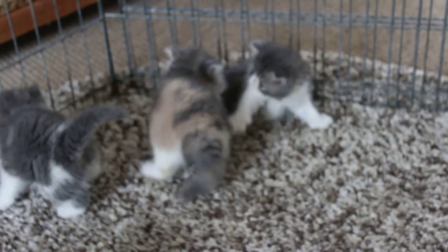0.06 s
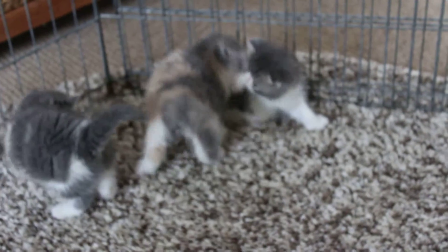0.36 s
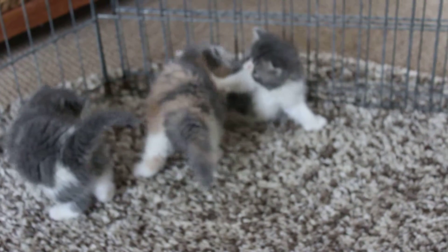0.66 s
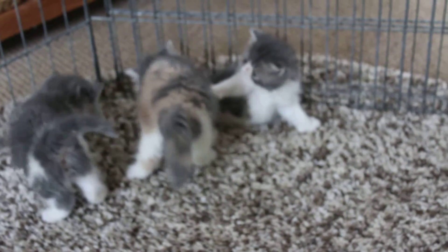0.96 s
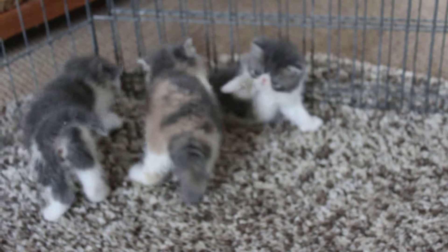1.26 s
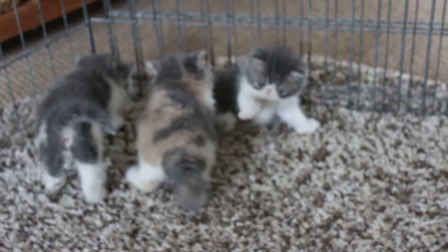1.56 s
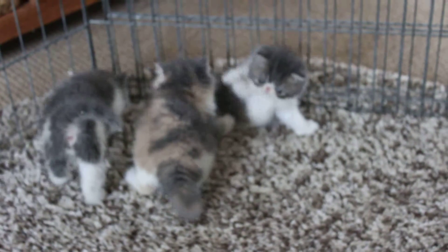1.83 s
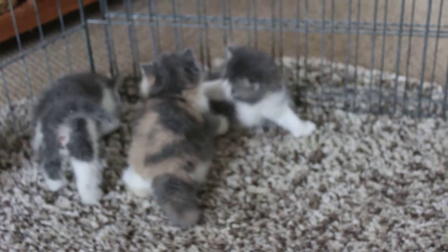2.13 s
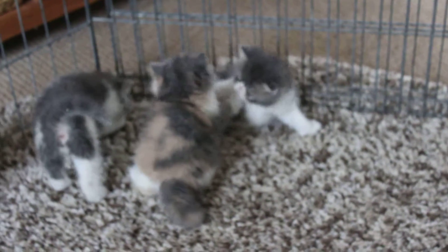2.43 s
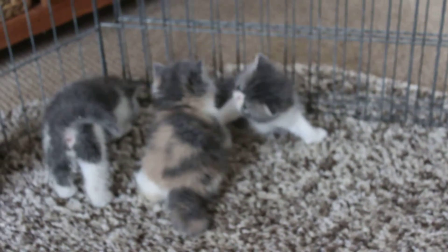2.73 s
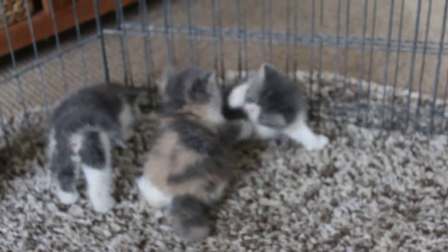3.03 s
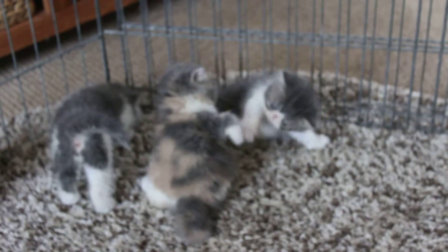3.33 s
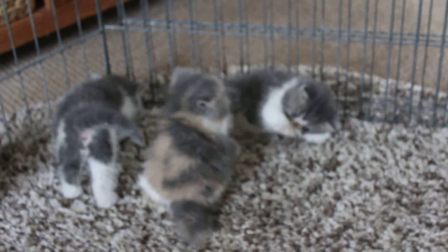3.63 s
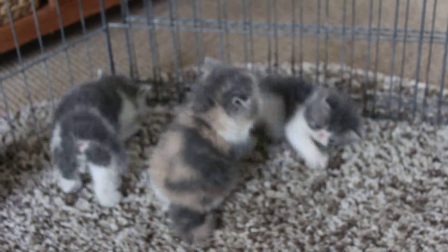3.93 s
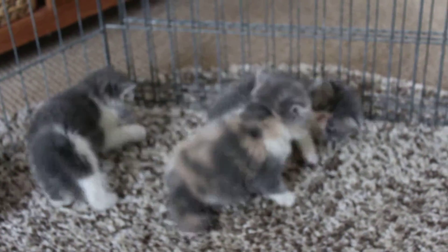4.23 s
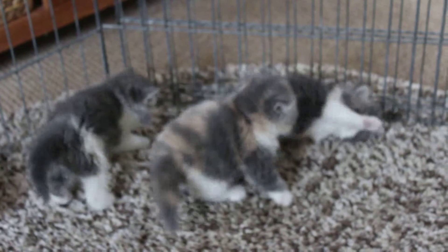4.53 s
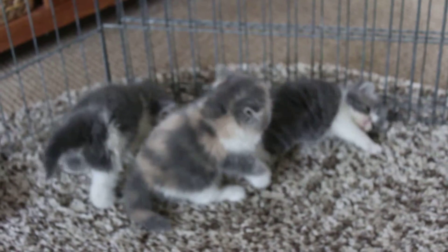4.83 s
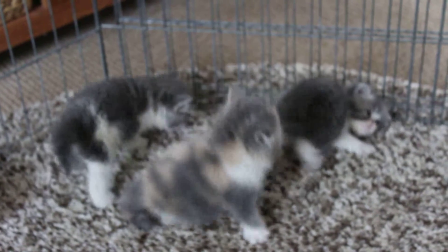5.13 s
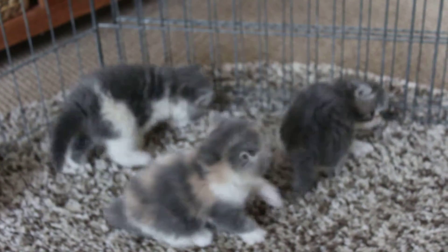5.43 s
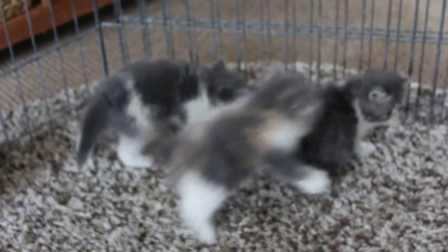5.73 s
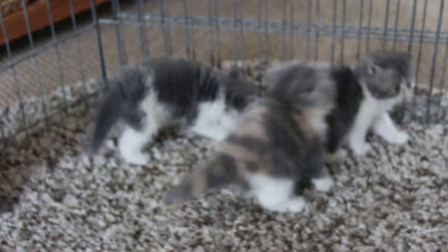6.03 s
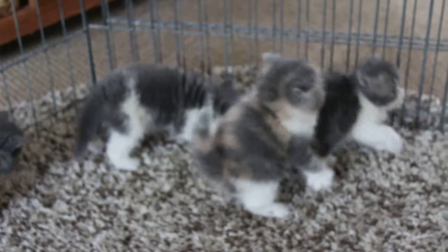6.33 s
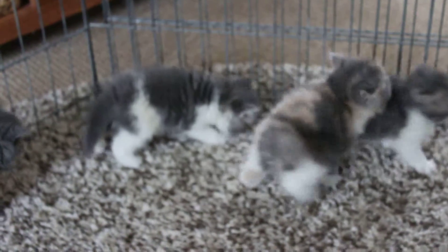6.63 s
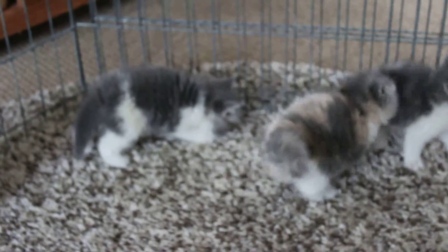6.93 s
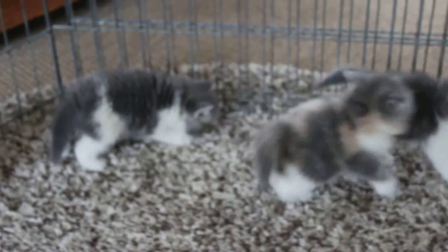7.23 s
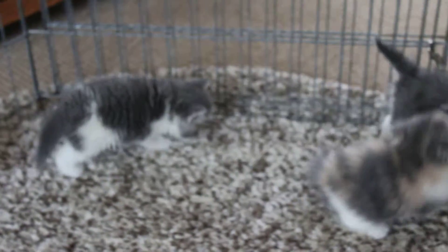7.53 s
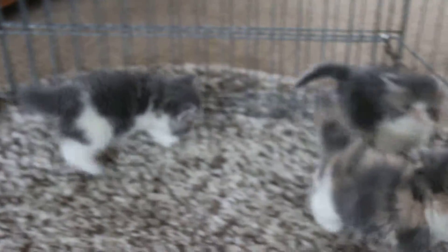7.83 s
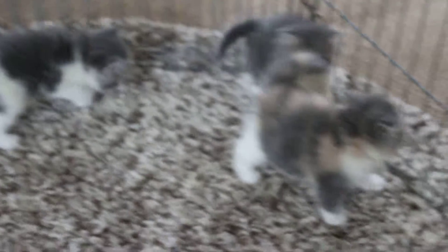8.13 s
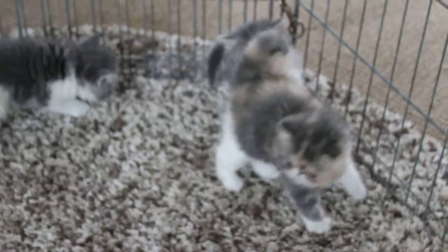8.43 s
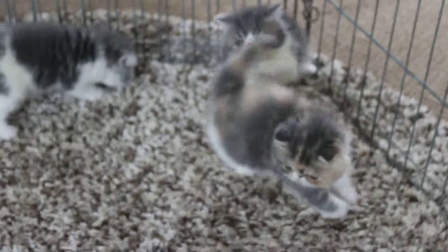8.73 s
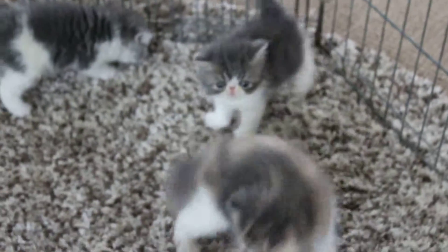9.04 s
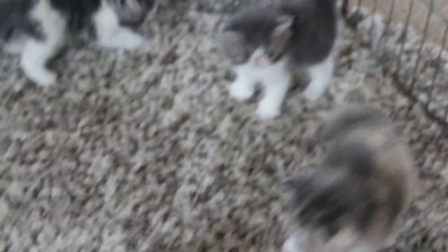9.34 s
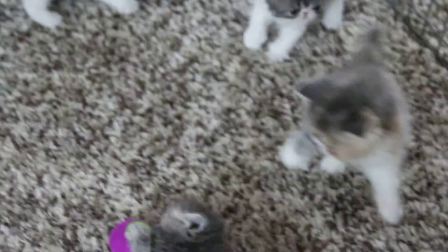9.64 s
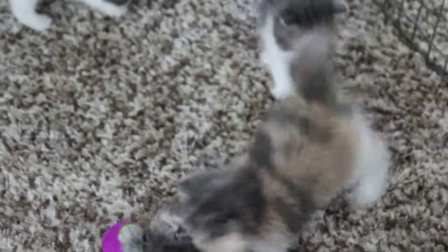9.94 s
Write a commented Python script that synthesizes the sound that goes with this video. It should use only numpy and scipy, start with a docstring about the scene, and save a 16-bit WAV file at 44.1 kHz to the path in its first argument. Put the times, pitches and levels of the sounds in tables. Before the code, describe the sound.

Kittens wrestle on a shag carpet in a quiet room, heard fairly close in mono. Fur and paws brush softly over the pile, and a light bump makes their wire pen ring. Claws rasp and pluck the carpet in runs of sharp snaps, with a few soft thuds. After a brief lull the scratching resumes, the pen rattles again, and the loudest snaps come near the end.

```python
"""Kittens wrestle on a shag carpet inside a wire pen, in a quiet room, heard in mono.
From the start, fur and paws brush the carpet. At 0.5 s a body jostles the pen and its wires ring.
Then claws catch loops of the pile and let them go in runs of sharp snaps. Soft thuds sound through
the floor near 4 and 5 s, and the claws rest around 6 s. They start again, the pen rings once more
at 7.6 s among further thuds, and the loudest snaps come near 9 s."""
import sys
import numpy as np
from scipy import signal
from scipy.fft import rfft, irfft
from scipy.io import wavfile
from scipy.ndimage import uniform_filter1d

SR = 44100
rng = np.random.default_rng(int(sys.argv[2]) if len(sys.argv) > 2 else 0)


def inscribe(sig):
    """Save sig as 16-bit PCM at rate SR to the path in sys.argv[1].

    A 1-D sig is mono; a 2-D sig holds one channel per row.
    Samples are clipped to [-1, 1] before scaling.
    """
    pcm = np.round(np.clip(np.atleast_2d(sig).T, -1, 1) * 32767)
    wavfile.write(sys.argv[1], SR, pcm.astype(np.int16))


N = 439677


def gain_of(db):
    """Turns decibels into a factor to multiply by."""
    return 10 ** (np.asarray(db) / 20)


def evened(x):
    """Scales a signal to an average strength (rms) of 1."""
    return x / np.sqrt(np.mean(x ** 2) + 1e-20)


def read(points, hz):
    """Looks up a table's value at the frequency hz."""
    f, value = np.transpose(points)
    return np.interp(np.log(hz + 1), np.log(f + 1), value)


def add(mix, s, sound):
    """Lays a sound into the mix at time s."""
    part = mix[max(round(s * SR), 0):][:len(sound)]
    part += sound[:len(part)]


def noise(tone):
    """Steady noise of strength 1, shaped by a tone table."""
    gains = gain_of(read(tone, np.fft.rfftfreq(N, 1 / SR)))
    return evened(irfft(rfft(rng.standard_normal(N)) * gains, N))


# tone of the quiet room: f/Hz, level/dB (levels in all tables are relative)
AIR_TONE = [(12, -38), (20, -12), (37, -10.5), (77, -0.5), (142, -3.5), (228, -4), (527, -6), (642, -7),
            (1000, -9.5), (1570, -11.5), (2260, -12), (4540, -19), (5850, -21.5), (14300, -36.5),
            (16000, -61)]
def air(noise_db=-51.5, hum_db=-65, hum_hz=118.7):
    """Steady room noise with a faint, wavering mains hum."""
    t = np.arange(N) / SR
    waver = evened(uniform_filter1d(rng.standard_normal(N), size=12000))
    hum = np.sin(2 * np.pi * hum_hz * t + 0.75 * waver)
    return gain_of(noise_db) * noise(AIR_TONE) + gain_of(hum_db) * hum


# fur sliding over the carpet: t/s, rub level/dB, fizz level/dB
FUR_LEVELS = [(0, -62, -70), (0.7, -54, -55), (1.5, -57, -61), (2.05, -57, -65), (2.42, -48, -56),
              (2.78, -53.5, -55), (3.1, -52, -64), (3.6, -52, -55), (4.1, -51.5, -55), (4.4, -50.5, -59),
              (5.2, -50.5, -58), (6.6, -52, -65), (7.0, -49, -64), (7.7, -48, -53), (8.7, -49.5, -57),
              (9.2, -49.5, -50), (9.6, -49.5, -70), (9.97, -52.5, -71)]
# tones of the soft rub and the high fizz: f/Hz, level/dB
RUB_TONE = [(300, -2.5), (900, -3), (1350, 4), (1800, -4), (2400, -1), (3500, 1), (4400, -1), (4900, 0),
            (5600, -5), (8000, -14.5), (12000, -43)]
FIZZ_TONE = [(4000, -19), (6000, -10), (7900, 9), (8800, 5), (10100, -1), (12000, -18), (16000, -38)]
def brushing():
    """Fur and paws slide over the carpet, which hisses softly and crackles."""
    times, *levels = np.transpose(FUR_LEVELS)
    rub_db, fizz_db = [np.interp(np.arange(N) / SR, times, db) for db in levels]
    hiss = gain_of(rub_db - 5.5) * noise(RUB_TONE) + gain_of(fizz_db - 12) * noise(FIZZ_TONE)
    return hiss + gain_of(rub_db - 11.5) * crackle()


def crackle(slips_per_s=110, spread_db=4, fibres=12):
    """Single fibres slip at random under a sliding paw."""
    out = np.zeros(N)
    for pitch_hz in rng.uniform(4800, 4850, fibres):
        slips = rng.random(N) < slips_per_s / fibres / SR
        strength = gain_of(spread_db * np.minimum(rng.exponential(1, N), 2.5))
        out += signal.oaconvolve(slips * strength, snap(pitch_hz, body_db=4.5, tick_db=-18))[:N]
    return evened(out)


# tones of a snap's dull body and bright tick: f/Hz, level/dB
BODY_TONE = [(60, -20), (300, -8), (650, -5), (1300, 0.5), (2400, 0.5), (4200, -0.5), (7000, -4.5),
             (10000, -12), (16000, -47)]
TICK_TONE = [(3000, -40), (7000, -6), (8600, 0.5), (9900, 6), (11300, -1.5), (12800, -20), (16000, -36)]
def snap(pitch_hz, body_db, tick_db, width_hz=1200, uneven_db=2.5, size=512):
    """One fibre springs free: a very short ring with a dull body and a bright tick."""
    hz = np.fft.rfftfreq(size, 1 / SR)
    ring = np.exp(-.5 * ((hz - pitch_hz) / width_hz) ** 2)
    body = gain_of(body_db + read(BODY_TONE, hz))
    tick_shift = (pitch_hz / 5540) ** 0.13 * np.exp(0.043 * rng.standard_normal())
    tick = gain_of(tick_db + read(TICK_TONE, hz / tick_shift))  # a taut fibre ticks higher
    power = ring ** 2 + body ** 2 + tick ** 2
    ripple = uniform_filter1d(rng.standard_normal(len(hz)), size=9)  # no two fibres alike
    ripple = evened(uniform_filter1d(ripple, size=7))
    log_gain = np.log(np.sqrt(power) * gain_of(uneven_db * ripple) + 1e-5)
    mirrored = np.concatenate([log_gain, log_gain[-2:0:-1]])
    spectrum = np.exp(np.conj(signal.hilbert(mirrored)))[:len(hz)]  # packs the sound into a sharp start
    recoil_s = 0.000408 * rng.uniform(0.53, 1.617)
    spectrum *= 1 + 0.15 * np.exp(-2j * np.pi * hz * recoil_s)  # the fibre whips back once
    spectrum *= np.exp(-1j * np.pi * .00012 * hz ** 2 / pitch_hz)  # high notes trail the low ones
    return irfft(spectrum * np.sqrt(power.sum() / np.sum(abs(spectrum) ** 2)), size)


# shifts of weight: loudest t/s, level/dB, half length/s
WEIGHT_SHIFTS = [(0.12, -53, 0.21), (0.55, -46, 0.066), (2.55, -50, 0.37), (3.36, -46, 0.16),
                 (4.551, -53, 0.19), (5.85, -51.5, 0.32), (6.804, -46.5, 0.19), (7.618, -47, 0.14),
                 (8.548, -50.5, 0.11), (9.25, -51, 0.32)]
# their dull tone: f/Hz, level/dB
SHIFT_TONE = [(80, -13), (190, -3.5), (275, 3), (370, -8), (500, -2.5), (900, -16.5), (2000, -44)]
def shuffle(stir_db=-67):
    """A slight, dull stir swells each time a body shifts its weight."""
    t = np.arange(N) / SR
    swells = sum(gain_of(db - 6.5) ** 2 * np.exp(-((t - s) / half) ** 2)
                 for s, db, half in WEIGHT_SHIFTS)
    return np.sqrt(gain_of(stir_db) ** 2 + swells) * noise(SHIFT_TONE)


# pushes on the pen: t/s, level/dB, rise/s, fall/s, hardest-hit f/Hz, boost there/dB,
# width of the boost in log pitch, ring compared with rattle/dB
PEN_PUSHES = [(0.502, -41, 0.018, 0.042, 2800, -3, 0.6, -1.5),
              (7.59, -42.5, 0.05, 0.022, 6860, 8, 0.2, -11),
              (7.619, -35, 0.0037, 0.038, 7000, 4, 0.22, -3.5)]
# notes of the wires: f/Hz, level/dB, time to fade by 60 dB/s
WIRE_NOTES = [(596, 3, 0.32), (800, -4, 0.2), (976, -6, 0.35), (2080, 2, 0.32), (3390, -1.5, 0.13),
              (4680, 1, 0.35), (4980, -3, 0.2), (5850, -9, 0.22), (6600, -7, 0.3), (6681, -6, 0.27),
              (7359, -4, 0.19), (7682, 0, 0.38), (7960, -1, 0.3), (9500, -2, 0.22), (9970, -2, 0.25),
              (10900, -4, 0.33), (11400, -7, 0.22)]
# tone of the rattling joints and frame: f/Hz, level/dB
RATTLE_TONE = [(40, -5), (90, 11), (170, 11.5), (320, 7.5), (520, 5.5), (780, 5), (1400, -2), (2200, 0.5),
               (3100, 4), (5000, 1), (6100, 2), (7800, 0), (8700, -0.5), (9900, 1.5), (11300, -8),
               (12300, -12), (16000, -27)]
def pen(length_s=.8, lead_s=.2, pushed_db=11):
    """Loose joints rattle and set the wires ringing, most of all the ones that are pushed."""
    out, t = np.zeros(N), np.arange(int(length_s * SR)) / SR
    hz = np.fft.rfftfreq(len(t), 1 / SR)
    for s, db, rise, fall, struck_hz, boost_db, width, ring_db in PEN_PUSHES:
        nearness = lambda f: np.exp(-(np.log((f + 1) / struck_hz) / width) ** 2)
        push = np.exp(-np.maximum((lead_s - t) / rise, (t - lead_s) / fall))
        rattle = push * noise(RATTLE_TONE)[:len(t)]
        ring = np.zeros(len(t))
        for wire_hz, wire_db, fade_s in WIRE_NOTES:
            energy = signal.lfilter([1], [1, -gain_of(-120 / fade_s / SR)], push ** 4)
            drift = 0.0055 * np.cumsum(push * rng.standard_normal(len(t)))  # knocks nudge the wave
            strength = gain_of(wire_db + pushed_db * nearness(wire_hz)) * np.sqrt(energy)
            ring += strength * np.sin(2 * np.pi * (wire_hz * t + drift + rng.random()))
        sound = rattle + gain_of(ring_db) * np.std(rattle) * evened(ring)
        tone = gain_of(db + boost_db * (nearness(hz) - .5))
        add(out, s - lead_s, irfft(rfft(sound) * tone, len(t)))
    return out


# claw strokes: t/s, length/s, slips, level/dB, f/Hz, fullness of tone/dB, first gap over last gap
CLAW_DRAGS = [(0.666, 0.047, 5, -19, 5500, -2, 0.97), (0.755, 0.025, 3, -2.5, 5900, -11, 0.7),
              (0.886, 0.042, 5, -17, 6200, -5.5, 0.87), (0.968, 0.036, 3, -2, 6000, -10, 1.02),
              (1.192, 0.05, 5, -15.5, 5370, -8, 1.1), (1.279, 0.065, 6, -23, 5000, 1, 1.1),
              (1.697, 0.1, 8, -21, 4800, -0.5, 1.2), (1.912, 0.08, 7, -27, 8400, 3.5, 0.9),
              (2.154, 0.23, 14, -24, 4700, 0, 0.89), (2.4643, 0.06, 5, -20.5, 5400, 4, 2),
              (3.008, 0.09, 8, -14.5, 4700, -3, 2.15), (3.1198, 0.078, 5, -17.5, 5195, 3.5, 1.9),
              (3.308, 0.08, 9, -14.5, 5200, -12, 1.15), (3.444, 0.056, 7, -18, 5180, -5.5, 1),
              (3.5114, 0.096, 9, -11, 5300, -7.5, 0.91), (3.704, 0.04, 4, -16.5, 4900, -2, 1.05),
              (3.7896, 0.12, 10, 1, 5550, -11, 3.76), (4.237, 0.12, 9, -20, 4470, -5, 0.91),
              (4.46, 0.036, 3, -15.5, 6500, 0, 1.1), (4.556, 0.037, 4, -15.5, 5460, -9, 1.17),
              (4.7327, 0.089, 4, -8, 4400, -2.5, 0.92), (4.831, 0.088, 8, -21, 4710, -4, 0.86),
              (4.955, 0.13, 14, -12.5, 5550, -13, 1.04), (5.167, 0.18, 16, -22.5, 6100, -7, 1.1),
              (5.421, 0.22, 20, -24, 8100, -8, 0.86), (6.773, 0.06, 7, -24, 8600, -6, 1.06),
              (6.968, 0.052, 3, -11, 6640, -2.5, 1.4), (7.2, 0.085, 9, -14.5, 5600, -9, 0.86),
              (7.43, 0.1, 8, -18.5, 5180, -12, 0.95), (7.788, 0.077, 4, -9, 6100, -5, 0.87),
              (7.931, 0.027, 4, -11, 4195, -7.5, 0.9), (8.227, 0.11, 12, -23.5, 5400, 2.5, 1.05),
              (8.3883, 0.038, 5, -5.5, 5850, -11, 0.88), (8.525, 0.11, 9, -21.5, 5330, -6.5, 0.88),
              (8.7, 0.099, 8, -21, 4800, -14, 1.2), (8.884, 0.11, 9, -16.5, 5190, -3, 1),
              (9.1556, 0.052, 4, -4.5, 5530, -11, 0.7), (9.4826, 0.13, 13, -13.5, 5070, -12.5, 0.93),
              (9.69, 0.061, 6, -15, 4970, -11, 1.16), (9.81, 0.088, 9, -18.5, 4950, -15, 1.05)]
# a slight, narrow dip in their tone: f/Hz, width/Hz, level/dB
RASP_DIP = [(4610, 260, -0.5)]
def claw_drags(soft_ends_db=7.5, scatter_db=1.6):
    """A dragged claw rasps over loop after loop, hardest in mid-stroke, with thin fibres between."""
    slips = []
    for start, length, count, db, pitch_hz, fullness_db, quickening in CLAW_DRAGS:
        gap, force, tune = rng.standard_normal((count, 3)).T
        unevenness = .06 - .006 * db  # a light drag is less even
        gaps = np.geomspace(quickening, 1, count - 1) * np.exp(unevenness * gap[1:])
        times = start + length * np.append(0, np.cumsum(gaps)) / gaps.sum()
        stroke = (2 * np.arange(count) + 1) / count - 1  # runs from about -1 to 1
        levels = db - soft_ends_db * stroke ** 2 + scatter_db * force
        slips += zip(times, levels, pitch_hz * (1 + 0.055 * tune), fullness_db - 3 * stroke)
        thin_times, thin_db = np.cumsum(rng.uniform(.005, .02, size=40)), 0.57 * db - 21
        for s, luck in zip(thin_times, rng.standard_normal(40)):
            if s < length:
                slips.append((start + s, thin_db + scatter_db * luck, pitch_hz, fullness_db))
    near, sideways = release_fibres(slips)
    rasp = gain_of(-0.35) * near + gain_of(-6.5) * room(sideways)
    hz = np.fft.rfftfreq(N, 1 / SR)
    dip = sum((gain_of(db) - 1) / (1 + 2j * (hz - f) / width) for f, width, db in RASP_DIP)
    return irfft(rfft(rasp) * (1 + dip), N)


# echoes from nearby surfaces: delay/s, level/dB
NEAR_ECHOES = [(0.0034, -13.5), (0.0039, -17), (0.0098, -12), (0.0114, -19.5), (0.0145, -26), (0.0214, -24)]
def release_fibres(rows, scatter_db=5):
    """Returns snaps with their first echoes, and the broader sound they send sideways into the room."""
    near, sideways = np.zeros((2, N))
    for s, db, pitch_hz, fullness_db in rows:
        # the more suddenly a fibre lets go, the more body and tick it has
        body_db, tick_db = fullness_db + 0.7, 1.28 * fullness_db - 7.5
        add(near, s, gain_of(db) * snap(pitch_hz, body_db, tick_db))
        side_hz = pitch_hz * rng.uniform(0.9, 1.03)
        side = gain_of(db - 3) * snap(side_hz, body_db, tick_db, width_hz=1450, uneven_db=3)
        add(sideways, s, side)
        paths = rng.standard_normal((len(NEAR_ECHOES), 2))  # each spot has its own echo paths
        for (delay, echo_db), (shift, luck) in zip(NEAR_ECHOES, paths):
            add(near, s + delay * (1 + .04 * shift), gain_of(echo_db + scatter_db * luck) * side)
    return near, sideways


# tough carpet loops snapping free: t/s, level/dB, f/Hz, fullness of tone/dB
LOOP_SNAPS = [(0.7437, -3, 5950, -14), (0.8335, -1.5, 5700, -10), (0.8662, -6, 5800, -10),
              (0.9406, -1.5, 6840, -11), (1.144, -19, 8200, -1), (1.178, -12, 5960, -1),
              (1.2696, -10.5, 5280, -3.5), (2.3146, -15, 5100, -6), (2.3995, -15, 5600, 5),
              (2.4391, -18.5, 5950, 4.5), (2.7964, -16, 7850, -5), (2.8924, -3.5, 6040, -7.5),
              (2.9299, -6.5, 5940, -10), (2.9527, -1, 7140, -8), (2.9714, 5, 5540, -14),
              (2.979, -4.5, 4700, -1.5), (3.5772, -8.5, 5500, -15), (3.7583, -13.5, 5760, 3.5),
              (4.1761, -10.5, 5600, -3), (4.3718, -4, 5500, -9), (4.385, -8.5, 5400, -3.5),
              (4.3938, -11, 6900, 0), (4.4315, -8.5, 6160, -1), (5.022, -6, 5860, -22),
              (6.886, 2.5, 6400, -12.5), (6.9274, -0.5, 5300, -3.5), (6.9509, -5.5, 5270, -1),
              (7.076, 6, 6500, -13.5), (7.1165, -0.5, 7500, -8), (7.126, -0.5, 6460, -15),
              (7.1686, -3.5, 7080, -12), (7.676, -6, 5300, -15), (7.698, 2, 6140, -15),
              (7.7619, -0.5, 6090, -6), (8.3594, -6.5, 5900, -10.5), (8.803, 0, 4420, -10),
              (8.8268, 11, 6360, -18), (8.8511, 3.5, 5920, -12.5), (9.0452, 9, 6750, -14),
              (9.0802, 1, 5730, -9), (9.109, -4, 6100, -4), (9.1314, -7.5, 5780, 1.5),
              (9.261, 11, 5580, -7), (9.3206, 0.5, 6470, -8), (9.3736, 5.5, 6300, -11.5),
              (9.4328, -5.5, 4700, -9), (9.4591, -9.5, 4820, -6), (9.8675, -6.5, 5760, -16)]
def claw_snaps():
    """A claw catches one tough loop at a time and lets it go with a sharp snap."""
    near, sideways = release_fibres(LOOP_SNAPS)
    return gain_of(0.34) * near + gain_of(-7.5) * room(sideways)


# blows on the floor: t/s, level/dB, f/Hz halfway down the pitch drop, time to fade by 60 dB/s
FLOOR_THUDS = [(3.985, -45, 118, 0.15), (5.126, -44, 83, 0.16), (7.502, -39.5, 110, 0.15),
               (7.622, -39, 150, 0.12), (7.978, -34.5, 278, 0.069), (7.989, -39, 100.5, 0.11),
               (8.868, -31.5, 115, 0.1), (9.02, -43, 85.2, 0.17)]
def thuds(rise_s=0.0014, sink_s=0.012):
    """A soft blow on the floor makes a low note that sinks as it dies away."""
    out, t = np.zeros(N), np.arange(SR // 3) / SR
    for s, db, hz, fade_s in FLOOR_THUDS:
        pitch_hz = hz * (0.6 + 0.8 * np.exp(-t / sink_s))
        strength = gain_of(db - 0.5 - 60 * t / fade_s) * (1 - np.exp(-t / rise_s))
        add(out, s, strength * np.sin(2 * np.pi * np.cumsum(pitch_hz) / SR))
    return out


# tone of the room's echo: f/Hz, level/dB
TAIL_TONE = [(300, 3.5), (1300, 2.5), (3000, -3.5), (4300, 1), (4900, 1.5), (6000, 5), (7300, -2.5),
             (8800, 5.5), (10200, -4), (12000, 12), (15000, 0.5)]
# how long it lasts: f/Hz, time to fade by 60 dB/s
TAIL_FADE = [(200, 0.46), (2000, 0.25), (6000, 0.23), (12000, 0.11)]
def room(x, build_s=0.001, echoes_per_s=8000):
    """Many tiny echoes blur into a short tail whose high notes die first."""
    echoes = rng.standard_normal(SR // 2) * (rng.random(SR // 2) < echoes_per_s / SR)
    hz, t, bands = signal.stft(echoes, SR, nperseg=256)
    bands = bands * gain_of(read(TAIL_TONE, hz)[:, None] - 60 * t / read(TAIL_FADE, hz)[:, None])
    tail = signal.istft(bands, SR, nperseg=256)[1]
    tail *= 1 - np.exp(-np.arange(len(tail)) / SR / build_s)
    return signal.fftconvolve(x, tail / np.linalg.norm(tail))[:N]


def scene():
    """Everything sounds in one room and reaches both channels alike."""
    background = air() + brushing() + shuffle()
    knocks = pen() + thuds()
    mono = background + claw_snaps() + claw_drags() + knocks + gain_of(-13.5) * room(knocks)
    return np.array([mono, mono])


def record(dry):
    """Cuts away the very highest treble."""
    low_pass = signal.firwin(255, cutoff=15700, window=("kaiser", 9), fs=SR)
    return signal.oaconvolve(dry, low_pass[None], "same")


dry = scene()
out = record(dry)
inscribe(out)
```